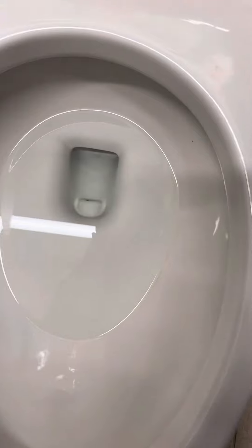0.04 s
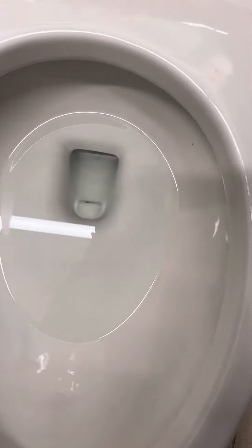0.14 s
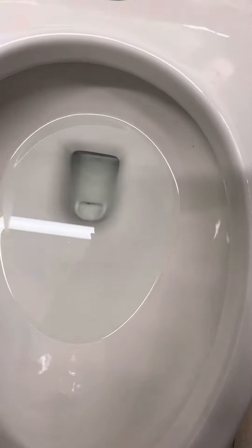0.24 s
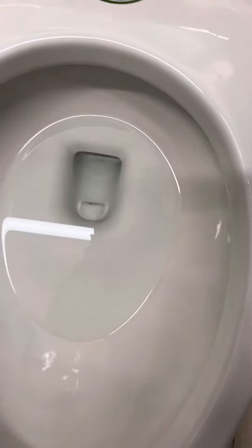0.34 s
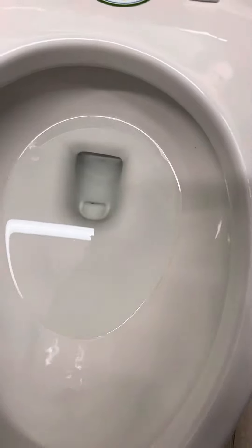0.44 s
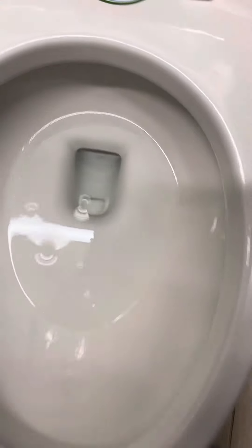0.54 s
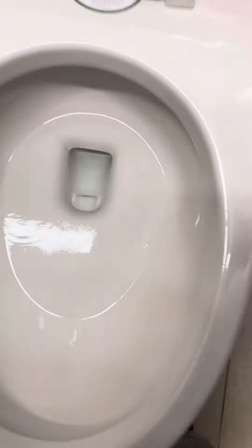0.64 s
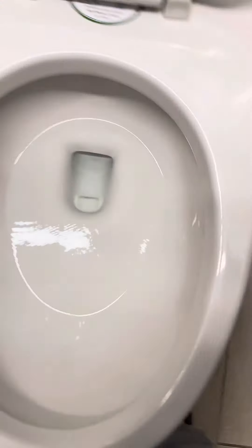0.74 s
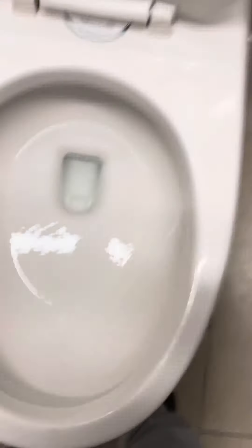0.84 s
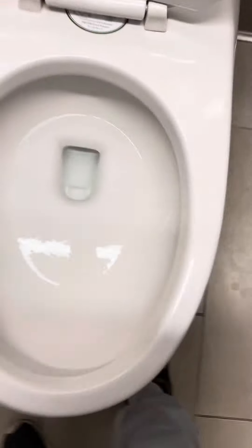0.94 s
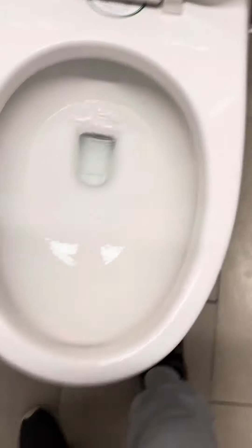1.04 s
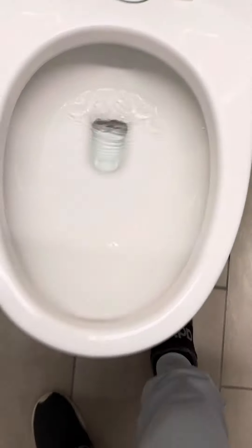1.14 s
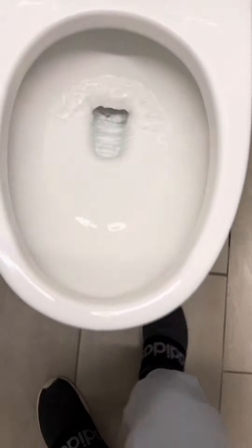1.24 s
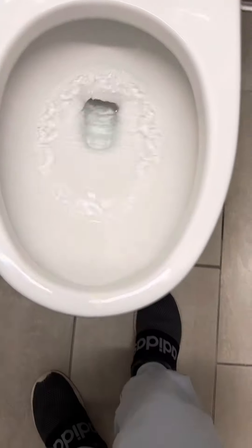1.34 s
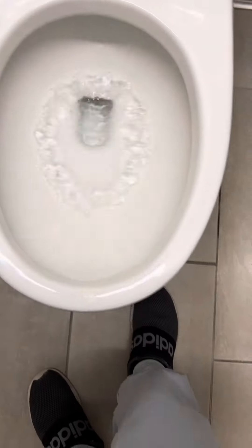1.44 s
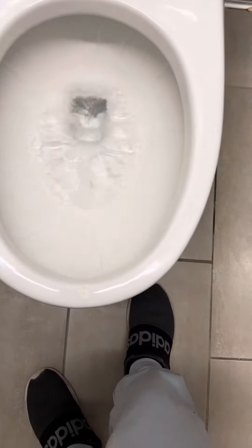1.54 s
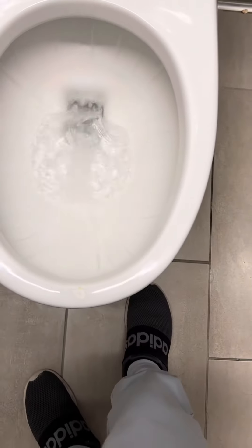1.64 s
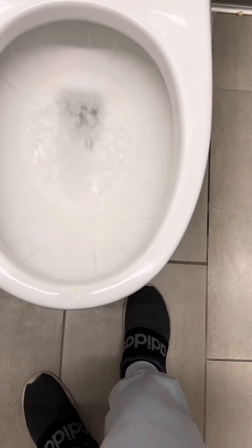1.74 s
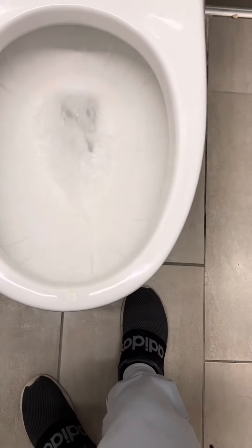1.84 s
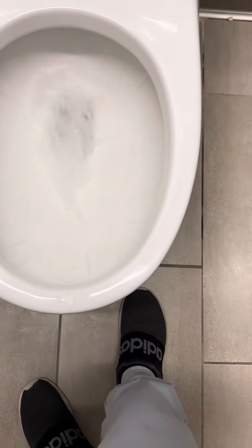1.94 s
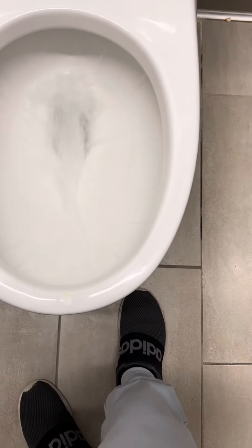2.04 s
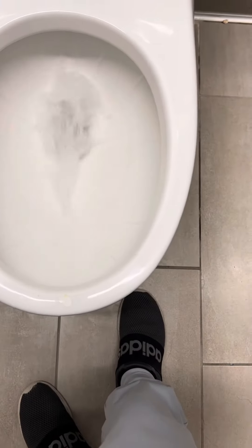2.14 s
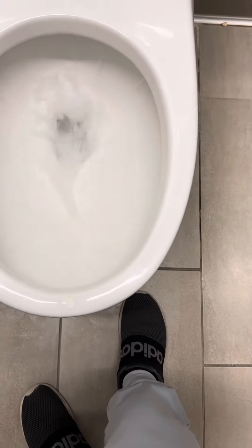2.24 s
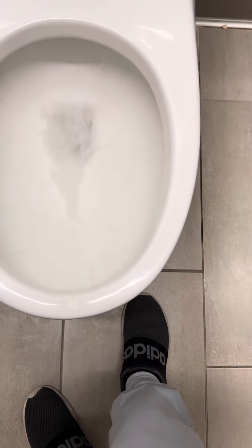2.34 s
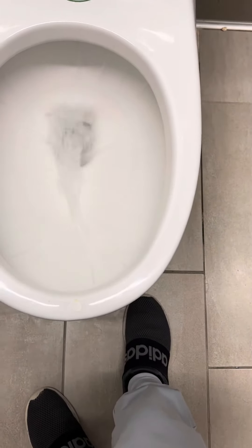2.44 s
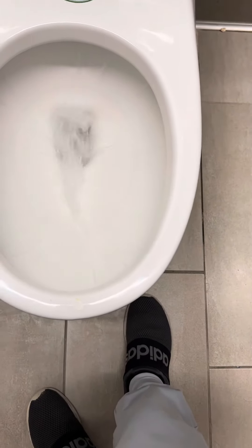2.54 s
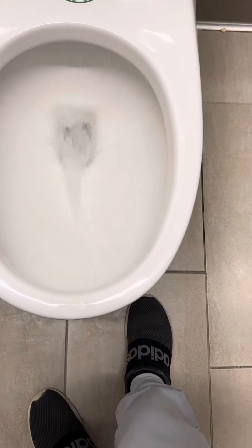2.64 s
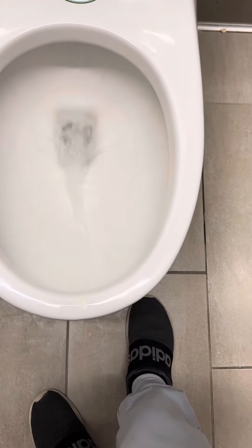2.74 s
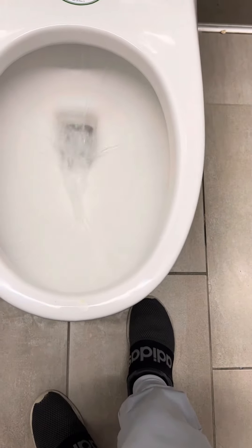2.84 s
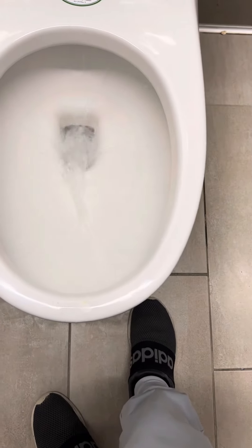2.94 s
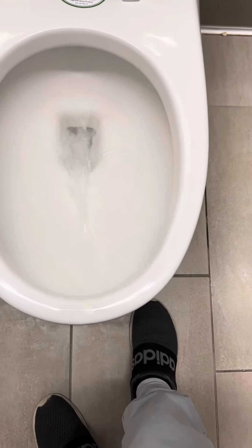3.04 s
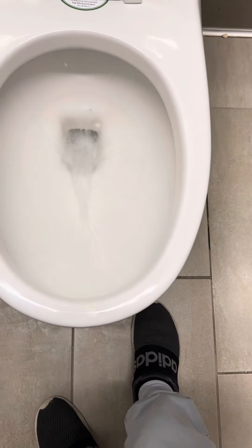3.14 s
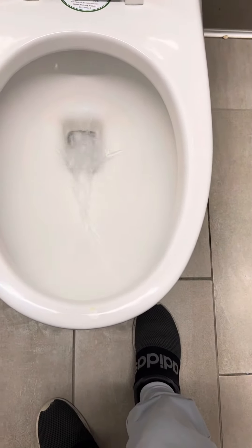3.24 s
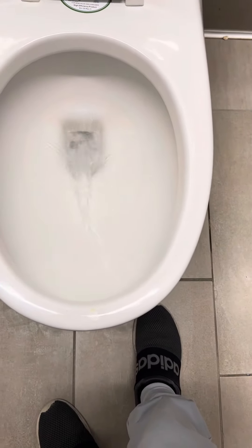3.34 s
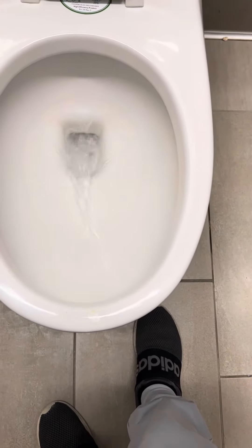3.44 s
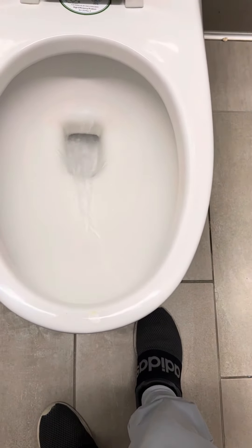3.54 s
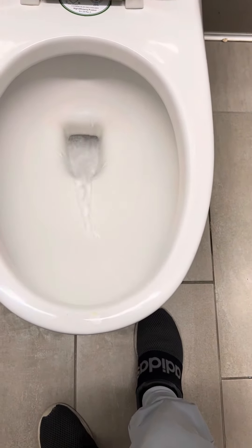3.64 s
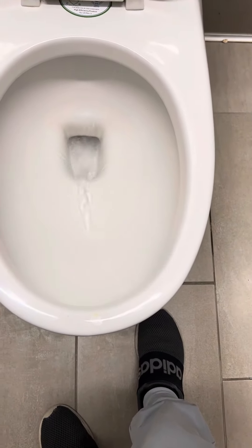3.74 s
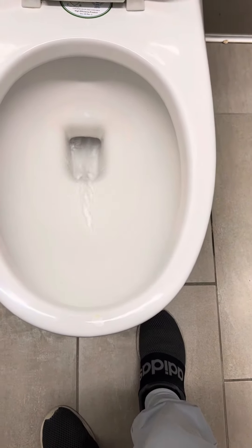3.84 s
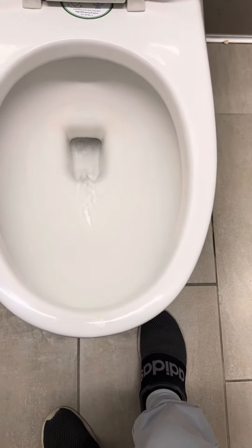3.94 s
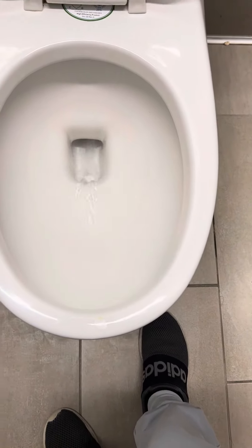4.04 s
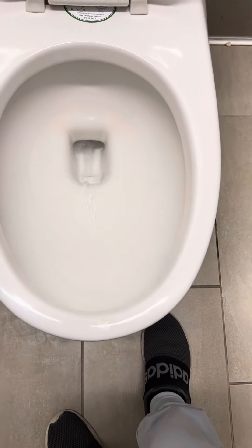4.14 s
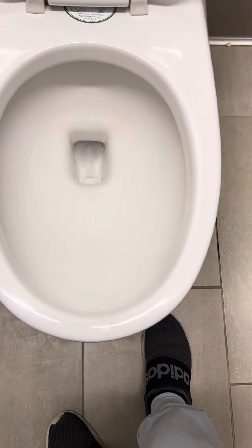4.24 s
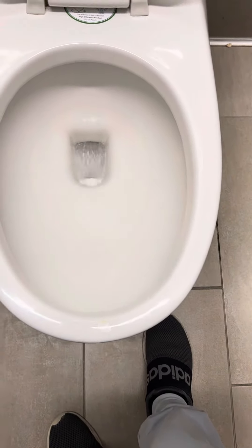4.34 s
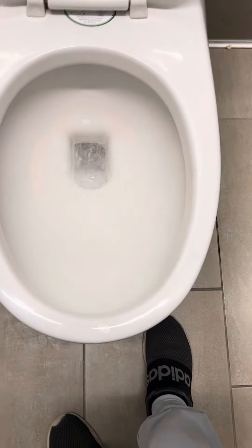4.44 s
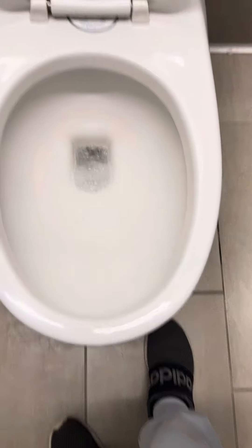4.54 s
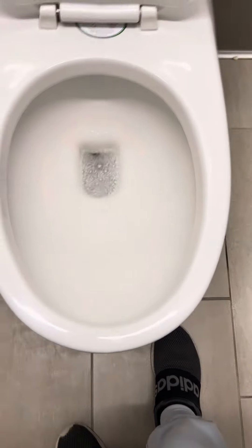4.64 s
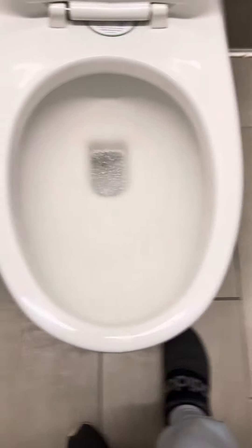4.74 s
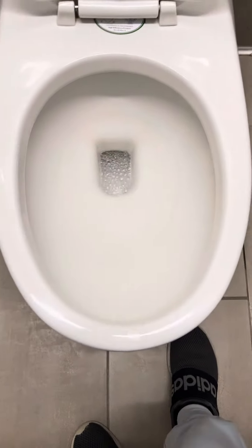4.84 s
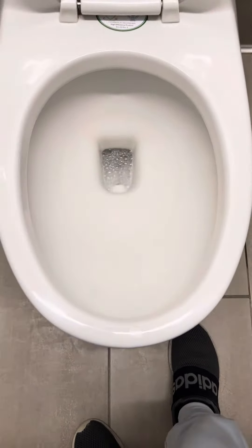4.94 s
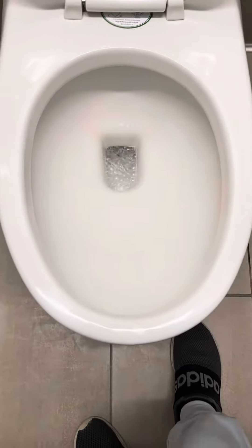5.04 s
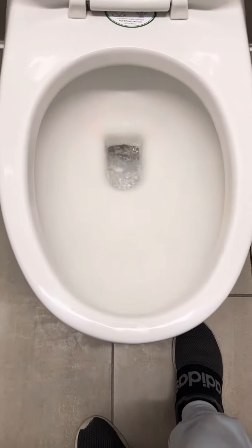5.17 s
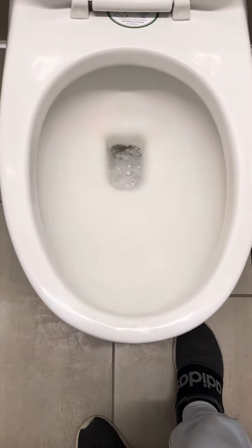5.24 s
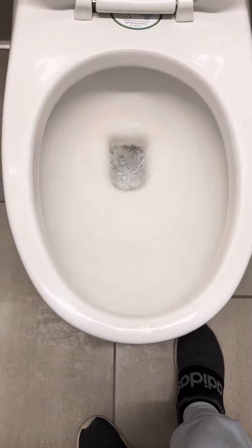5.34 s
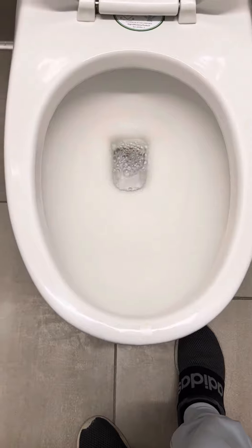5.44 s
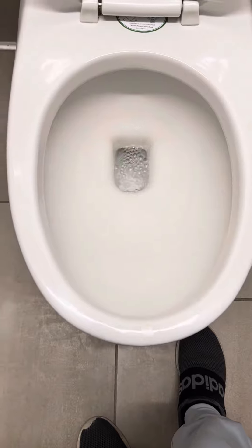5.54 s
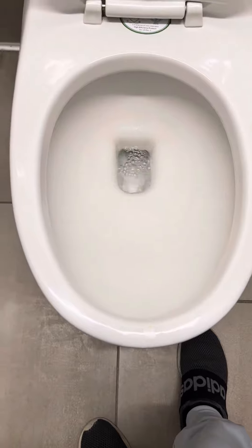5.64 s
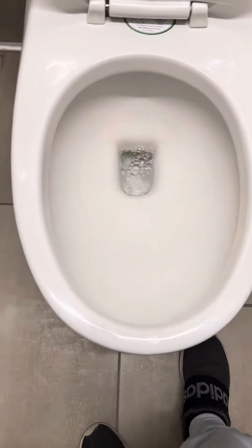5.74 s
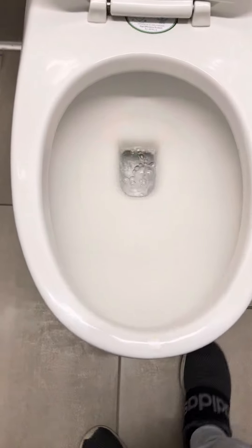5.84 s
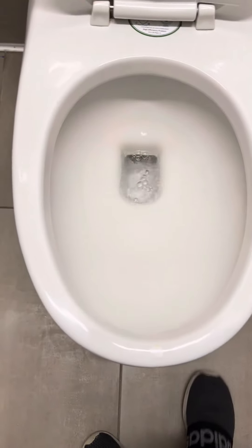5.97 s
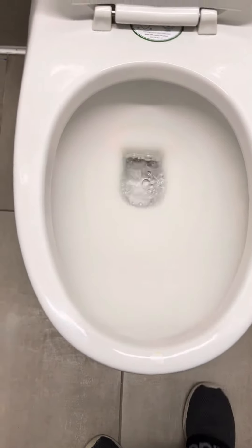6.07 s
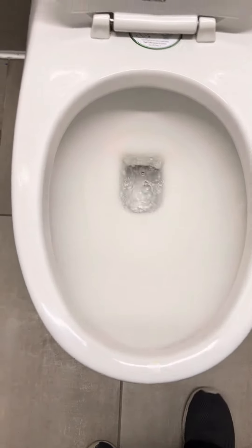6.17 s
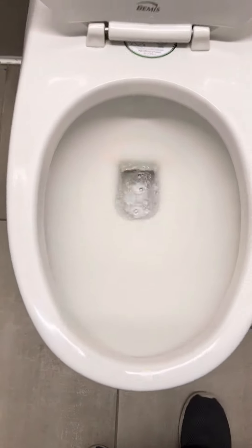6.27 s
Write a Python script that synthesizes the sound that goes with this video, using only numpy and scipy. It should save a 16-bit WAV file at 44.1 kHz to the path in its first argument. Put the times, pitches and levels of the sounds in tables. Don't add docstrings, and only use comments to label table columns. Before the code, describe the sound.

Near-silent room rumble, then a knock and deep booming pipe shudder as a toilet is flushed. Quick wet slaps become a dense broadband rush round the bowl, broken by heavy hollow glugs and popping air pockets, with unsteady high whistles over the hiss. The rush softens, a hollow hum sounds briefly, and it dies to clicks, a short cluster of plinking drips and sparse ticks. Handheld close stereo pickup, short tiled reverberation.

```python
import sys
import numpy as np
from scipy import signal
from scipy.fft import rfft, irfft
from scipy.io import wavfile
from scipy.ndimage import uniform_filter1d, minimum_filter1d

SR = 44100
rng = np.random.default_rng(int(sys.argv[2]) if len(sys.argv) > 2 else 0)


def master(y):
    cut = np.clip(np.atleast_2d(y).T, -1, 1)
    pcm = np.round(cut * 32767)
    wavfile.write(sys.argv[1], SR, pcm.astype(np.int16))


def to_linear_factor(level_db):
    exponent = np.asarray(level_db, float) / 20
    return 10 ** exponent


N = 278196

# time in seconds, jet flow in dB, air drawn into the trap in dB against the flow.
FLUSH_FLOW = [(0.0, -73, -0.5), (0.268, -61.5, -5.5), (0.284, -51, 5), (0.534, -44, 3.5), (0.955, -49, -5),
              (1.215, -33, -8), (1.275, -24, -20), (1.6, -30, -6.5), (1.84, -29, 9.5), (1.898, -32.5, 16),
              (1.972, -29, 7.5), (2.19, -29, 7.5), (2.26, -29.5, 4), (2.98, -32, -2), (3.03, -33.5, -0.5),
              (3.79, -42.5, -6), (4.28, -58, 1), (4.5, -72, 3.5)]
# time in seconds, jet flow in dB, air in dB against the flow.
REFILL_FLOW = [
    (4.539, -73, -2),
    (4.651, -62, -6.5),
    (4.901, -74, -12),
    (4.93, -64, -2.5),
    (4.999, -58.5, 5),
    (5.06, -69, 1.5),
    (5.25, -71, 2),
    (5.45, -76, -7),
    (6.31, -91.5, 8),
]
# frequency in Hz, density in dB per Hz.
FAINT_SPECTRUM = [(5000, -32.5), (5700, 7.5), (8000, 6.5), (9500, -4.5), (11000, -21.5), (16000, -38.5)]


def evened(x):
    return x / np.sqrt(np.mean(x ** 2) + 1e-20)


def read(points, hz):
    f, value = np.transpose(points)
    return np.interp(np.log(hz + 1), np.log(f + 1), value)


def curves(rows):
    s, *columns = np.transpose(rows)
    return [np.interp(np.arange(N) / SR, s, c) for c in columns]


def swells(rows):
    t, power = np.arange(N) / SR, 0
    for s, rise, hold, db, fall_db in rows:
        attack = np.clip((t - s) / rise, 0, 1) ** 2
        decay = to_linear_factor(db - fall_db * np.maximum(t - s - rise - hold, 0))
        power = power + (attack * decay) ** 2
    return np.sqrt(power)


def colour(x, points):
    return irfft(rfft(x) * to_linear_factor(read(points, np.fft.rfftfreq(N, 1 / SR))), N)


def wander(per_s):
    slow = signal.butter(2, per_s, fs=SR, output="sos")
    return evened(signal.sosfilt(slow, rng.standard_normal(N)))


def resonate(x, hz, width):
    turn = np.exp(2j * np.pi * np.cumsum(hz * np.ones(N)) / SR)
    r = np.exp(-np.pi * width / SR)
    return 2 * (turn * signal.lfilter([(1 - r) ** 2], [1, -2 * r, r * r], x / turn)).real


def resonant_noise(hz, width):
    return evened(resonate(rng.standard_normal(N), hz, width))


def lead(hz):
    # frequency in Hz, lead in half turns.
    low_leads = [(0, 0), (110, -.015), (200, -.1), (800, -.31), (1500, 0), (1750, .02), (2650, .7),
                 (3750, .27), (4300, .62), (4850, .5)]
    # lower edge in Hz, upper edge in Hz, lead held between them in half turns.
    rests = [(5400, 5850, 1), (7150, 8200, 2), (9550, 10900, 3), (11850, 13100, 4), (14700, 15500, 5),
             (16000, 16200, 5.04)]
    f, turns = np.transpose(low_leads + [(edge, k) for low, high, k in rests for edge in (low, high)])
    return np.pi * np.interp(hz, f, turns)


def likeness(hz):
    # frequency in Hz, unshared part between rests as a fraction.
    unshared = [(60, 0.033), (700, 0.081), (1100, .3), (2200, 0.47), (3700, 0.77), (5000, 1), (9000, 1),
                (14000, 0.96)]
    return np.clip(1 - read(unshared, hz) * abs(np.sin(lead(hz))) ** 1.2 - .0003, 0, 1)


def wash(points, patchy_db, size=256):
    frames, hz = 4 * N // size + 5, np.fft.rfftfreq(size, 1 / SR)
    a, b, c, d, patches = rng.standard_normal((frames, len(hz), 5)).T
    patches = evened(uniform_filter1d(uniform_filter1d(patches, 3, 0), 24, 1))
    same, left = likeness(hz)[:, None], a + 1j * b
    right = same * left + np.sqrt(1 - same ** 2) * (c + 1j * d)
    z = np.array([left, right]) * to_linear_factor(patchy_db * patches)
    noise = signal.istft(z, nperseg=size, noverlap=size * 3 // 4)[1][:, :N]
    return evened(colour(noise, points))


def bubbles(points, low_hz, high_hz, per_s, cycles, spread_db):
    out = np.zeros(N)
    for hz in np.geomspace(low_hz, high_hz, 14):
        u = np.arange(int(3 * cycles * SR / hz)) * hz / SR
        ring = np.sin(2 * np.pi * u * (1 + 0.029 * u)) * np.exp(-2 * u / cycles) * (1 - np.exp(-2 * u))
        born = rng.random(N) < per_s / 14 / SR
        size = to_linear_factor(spread_db * np.minimum(rng.exponential(1, N), 2.8)) * born
        out += signal.oaconvolve(size, ring)[:N]
    return evened(colour(out, points))


def pings(rows, rise, snap=1.0):
    out, t = np.zeros(N), np.arange(SR // 8) / SR
    for s, db, hz, t60 in rows:
        part = out[round(s * SR):][:len(t)]
        turn = 2 * np.pi * hz * t * (1 + rise * t)
        upper = 0.63 * np.sin(1.83 * turn) * np.exp(-t * hz / 0.9)
        ring = (np.sin(turn) + upper) * (1 - np.exp(-t * hz * snap))
        decay = to_linear_factor(db + 1.5 - 60 * (t / max(t60, .005)) ** 1.062)
        part += (decay * ring)[:len(part)]
    return out


def glides(rows):
    out, flutter, gusts = np.zeros(N), wander(200), wander(150)
    for s, length, start_hz, end_hz, db in rows:
        at = slice(round(s * SR), round((s + length) * SR))
        hz = np.linspace(start_hz, end_hz, at.stop - at.start) * (1 + 0.007 * flutter[at])
        tone = np.sin(2 * np.pi * np.cumsum(hz) / SR) * signal.windows.tukey(len(hz), .6)
        out[at] += to_linear_factor(db + 4 * np.minimum(gusts[at], 1)) * tone
    return out


def room_floor():
    # frequency in Hz, density in dB per Hz.
    floor_spectrum = [(30, -6.5), (48, 3.5), (100, -3.5), (250, -7.5), (500, -13.5), (1000, -31),
                      (2700, -33), (5000, -29), (8500, -38.5), (10500, -60)]
    return to_linear_factor(-57.5) * wash(floor_spectrum, patchy_db=-4.0)


def room(x):
    # frequency in Hz, reverberation time T60 in seconds.
    decay_times = [(200, 0.084), (1000, 0.33), (5000, 0.23), (14000, 0.037)]
    taps = np.zeros((2, SR // 2))
    at = np.arange(160, SR // 2 - 20, 20) + rng.integers(0, 20, (2, (SR // 2 - 161) // 20))
    np.put_along_axis(taps, at, rng.choice([-1., 1.], at.shape), 1)
    hz, t, z = signal.stft(taps, SR, nperseg=256)
    same = likeness(hz)[:, None]
    z = np.array([z[0], same * z[0] + np.sqrt(1 - same ** 2) * z[1]])
    tail = signal.istft(z * to_linear_factor(-60 * t / read(decay_times, hz)[:, None]), SR, nperseg=256)[1]
    return signal.fftconvolve(x[None], tail / np.linalg.norm(tail[0]), axes=1)[:, :N]


def drained():
    return np.clip(np.arange(N) / SR - 2, -1, 2.4)


def boom(pressure_db):
    # frequency in Hz, density in dB per Hz.
    boom_spectrum = [(25, -56.5), (45, -21.5), (66, 4), (78, -8.5), (89, 4.5), (105, -9), (140, -14),
                     (200, -57.5)]
    return to_linear_factor(pressure_db) * wash(boom_spectrum, patchy_db=1.6, size=1024)


def shudder(pressure_db, surge):
    # frequency in Hz, density in dB per Hz.
    shudder_spectrum = [(110, -21.5), (140, -6.5), (170, 0.5), (200, 2), (245, 7.5), (275, -0.5),
                        (330, -42.5)]
    # start in seconds, rise in seconds, hold in seconds, level in dB, fall in dB per second.
    valve_shudder = [
        (0.3, 0.12, .01, -52, 45.9),
    ]
    level = np.hypot(to_linear_factor(pressure_db - 5), swells(valve_shudder))
    return level * to_linear_factor(2.6 * surge) * wash(shudder_spectrum, patchy_db=2.0, size=1024)


def hum(surge):
    # frequency in Hz, density in dB per Hz.
    body_spectrum = [(230, -30), (280, -1), (306, 9), (330, -9), (356, 8), (385, -5), (415, 5), (440, -7.5),
                     (520, -8.5), (640, -46)]
    # start in seconds, rise in seconds, hold in seconds, level in dB, fall in dB per second.
    valve_hum = [
        (0.24, 0.077, 0.25, -35.5, 23),
        (1.0, 0.22, 0.086, -37.5, 32),
        (3.0, 0.07, 0.1, -46.5, 37),
        (3.87, 0.047, 0.25, -47.5, 153.5),
    ]
    flow_db, air_db = curves(FLUSH_FLOW + REFILL_FLOW)
    driven = to_linear_factor(flow_db + air_db - 4.5 - drained())
    idle = to_linear_factor(-66.5)
    level = np.hypot(driven, swells(valve_hum) + idle)
    return level * to_linear_factor(1.2 * surge) * wash(body_spectrum, patchy_db=1.5, size=1024)


def pipes():
    # time in seconds, pressure unrest in dB.
    pressure = [(0.0, -50), (0.23, -50.5), (0.324, -42), (0.522, -27), (0.874, -41), (1.0, -41.5),
                (1.4, -44), (1.89, -39), (2.5, -36), (3.35, -47.5), (3.7, -54.5), (3.87, -62), (3.95, -48),
                (4.27, -50.5), (4.5, -70), (4.75, -64.5), (5.25, -59.5), (6.31, -60)]
    pressure_db, surge = curves(pressure)[0], wander(14)
    return boom(pressure_db) + shudder(pressure_db, surge) + hum(surge)


def leaking_valve():
    # start in seconds, rise in seconds, hold in seconds, level in dB, fall in dB per second.
    leaks = [
        (0.13, 0.088, 0.19, -59.5, 400),
        (4.57, 0.037, 0.077, -62.5, 159),
    ]
    return to_linear_factor(8.5) * swells(leaks) * resonant_noise(4900, 750)


def singing_trap():
    # start in seconds, rise in seconds, hold in seconds, level in dB, fall in dB per second.
    column = [
        (2.2, .05, 0.089, -49, 60),
        (3.06, 0.07, 0.094, -36, 120),
        (4.0, 0.026, 0.13, -49.5, 199),
    ]
    # start in seconds, rise in seconds, hold in seconds, level in dB, fall in dB per second.
    moan = [
        (4.6, 0.035, 0.11, -56.5, 120.6),
        (4.99, 0.021, 0.129, -62, 80.3),
    ]
    return swells(column) * resonant_noise(301, 44) + swells(moan) * resonant_noise(446, 88)


def knocks():
    # start in seconds, peak in dB, frequency in Hz, ring T60 in seconds.
    pipe_knocks = [
        (0.289, -15, 362, 0.07),
        (0.303, -31, 350, .12),
        (0.457, -25, 232, 0.091),
        (0.542, -9, 266, 0.028),
        (1.575, -18, 324.1, 0.4),
        (1.589, -14.5, 323.3, 0.24),
    ]
    # start in seconds, peak in dB, frequency in Hz, ring T60 in seconds.
    wall_thumps = [(0.323, -19.5, 77.6, 0.23), (0.491, -6.5, 87, 0.065), (0.615, -15, 69.6, 0.25),
                   (0.679, -15, 85.9, 0.13), (0.721, -18.5, 56.5, 0.15), (0.741, -19, 87, 0.18),
                   (0.807, -22.5, 86, 0.2), (0.867, -19, 80, 0.13), (3.95, -37, 91.5, 0.097),
                   (1.04, -28, 79, 0.22), (1.252, -30, 76.6, .2), (3.17, -40, 62, 0.198),
                   (5.85, -43, 49.4, .3)]
    return pings(pipe_knocks + wall_thumps, rise=0.092)


def drips():
    # start in seconds, peak in dB,
    # frequency in Hz, ring T60 in seconds.
    drops_and_slaps = [(0.116, -45, 1840, .019), (0.338, -31, 974, .05), (4.094, -42, 2100, .015),
                       (4.121, -29, 666, .022), (4.161, -36, 700, .02), (3.99, -36, 720, .015),
                       (4.42, -48, 1400, .04), (4.204, -43, 1550, .06), (4.29, -44, 1400, .04),
                       (4.32, -44, 1200, .04), (4.584, -53, 1774, .036), (4.9235, -31, 1450, .035),
                       (4.944, -35, 1110, .04), (4.976, -43, 950, .025), (4.99, -36.5, 1400, .025),
                       (5.018, -42, 1380, .04), (5.041, -44, 1390, .06), (5.062, -50, 1100, .03),
                       (5.076, -34.5, 690, .075), (5.741, -54, 1260, .02), (4.955, -54, 3700, .04),
                       (4.985, -52, 2700, .04), (5.0, -53, 3700, .04), (5.012, -51, 2700, .03),
                       (5.04, -52, 2300, .03), (5.128, -53, 1800, .03), (5.145, -53, 1250, .03),
                       (5.425, -60, 1060, .02), (5.545, -62, 1160, .02), (5.67, -58, 1300, .012),
                       (5.742, -58, 800, .02),
                       (.285, -50, 1800, .022), (.337, -36, 1860, .019), (1.01, -29, 1330, .02),
             (1.011, -28, 790, .04), (1.052, -30, 1450, .03), (1.053, -28, 790, .025),
             (1.088, -29, 1340, .07), (1.106, -29, 1400, .02), (1.129, -24, 1500, .015),
             (1.149, -24, 1600, .025), (1.177, -29, 1150, .025), (1.205, -25, 1800, .02),
             (1.232, -28, 800, .04), (1.238, -22, 1600, .03), (1.293, -18, 1650, .025),
             (1.332, -16, 1850, .03), (1.372, -21, 1350, .03), (1.405, -21, 1450, .04),
             (1.465, -20, 1500, .03), (4.926, -47, 2300, .02), (4.94, -46, 2000, .02),
             (4.958, -45, 1250, .02), (4.965, -48, 800, .02), (4.998, -48, 560, .04),
             (5.0, -44, 1100, .025), (5.03, -47, 520, .05), (5.078, -39, 1490, .035)]
    # start in seconds, length in seconds, first pitch in Hz, last pitch in Hz, level in dB.
    bloops = [
        (0.7, .09, 1020, 1040, -50),
        (4.913, .012, 2500, 2300, -64),
        (5.857, .016, 1230, 1270, -66),
        (5.876, .026, 1450, 1950, -71),
        (5.934, .018, 1230, 1120, -59),
        (5.946, .038, 1110, 1260, -64),
    ]
    return pings(drops_and_slaps, rise=0.67, snap=3.6) + glides(bloops)


def ticks():
    # start in seconds, peak in dB, centre frequency in Hz.
    bursts = [(0.2805, -36, 3374), (0.3351, -28, 2300), (0.402, -37.5, 4910), (0.498, -30, 2665),
              (0.8206, -35, 4087), (0.9697, -31.5, 12910), (1.0093, -25, 7130), (1.0298, -27, 3247),
              (1.052, -24, 12050), (1.0877, -24, 12190), (1.1293, -18.5, 12500), (1.1456, -21, 12500),
              (1.1714, -25, 12950), (1.2047, -22, 7500), (1.2327, -17, 7800), (1.2607, -14, 7020),
              (1.4253, -16, 3220), (1.4667, -15, 4900), (1.4952, -15, 3620), (4.0273, -38, 6900),
              (4.0386, -33.5, 3894), (4.0908, -38, 7080), (4.1789, -31, 13150), (4.2994, -43, 3776),
              (4.6039, -49, 4930), (4.6384, -50, 4000), (4.653, -46, 5000), (4.9218, -50.5, 7730),
              (4.9551, -51, 3680), (5.1531, -57, 13400), (5.3008, -50.5, 4660), (5.5144, -57, 4500),
              (5.531, -50, 8130), (5.67, -55, 5000), (5.7399, -52, 3500), (5.8771, -63, 6700),
              (5.923, -55, 4800), (5.9738, -64, 6500), (6.0835, -57, 8200), (6.1684, -59, 6640)]
    out, t = np.zeros(N), np.arange(SR // 10) / SR
    hz = np.fft.rfftfreq(len(t), 1 / SR) + 1
    decay = 1.6 * to_linear_factor(-60 * t / 0.011) + 0.73 * to_linear_factor(-60 * t / 0.069)
    for s, db, centre in bursts:
        octaves = np.log2(hz / centre)
        band = to_linear_factor(np.minimum(2.3 * octaves, -6.0 * octaves))
        puff = evened(irfft(rfft(rng.standard_normal(len(t))) * band, len(t)))
        part = out[round(s * SR):][:len(t)]
        part += (to_linear_factor(db - 6.5) * decay * puff)[:len(part)]
    return out


def water_sheet():
    # start in seconds, rise in seconds, hold in seconds, level in dB, fall in dB per second.
    sheets = [
        (.955, .005, .015, -46, 600),
        (1.05, .004, .012, -40, 700),
        (1.078, .008, .03, -39, 600),
        (1.118, .008, .012, -36, 800),
        (1.146, .005, .012, -36, 700),
        (1.174, .008, .03, -34, 700),
        (1.23, .04, .09, -30, 120),
    ]
    return swells(sheets) * resonant_noise(1750, 1200)


def whistles():
    # start in seconds, length in seconds, first pitch in Hz, last pitch in Hz.
    squeals = [(1.956, .035, 4750, 4750), (1.972, .028, 4300, 4050), (1.984, .036, 5200, 5180),
               (1.994, .02, 3610, 3450), (2.035, .03, 4800, 4900), (2.056, .035, 4640, 4530),
               (2.093, .022, 4800, 4650), (2.126, .04, 5200, 5180), (2.148, .03, 4720, 5000),
               (2.19, .03, 4120, 4080), (2.177, .05, 5220, 5200), (2.21, .04, 3980, 3960),
               (2.217, .03, 4340, 4800), (2.292, .025, 4770, 4850), (2.4, .025, 4200, 4200),
               (2.4, .045, 3700, 3900), (2.417, .07, 4850, 4880), (2.515, .04, 4900, 4820),
               (2.527, .045, 4300, 4100), (2.55, .03, 4000, 3880), (2.57, .035, 4790, 4900),
               (2.612, .05, 3980, 3800), (2.685, .04, 4980, 4800), (2.692, .035, 4130, 4200),
               (2.711, .048, 4410, 3450), (2.737, .055, 3320, 3330), (2.75, .025, 5000, 5050),
               (2.822, .05, 3720, 3900), (2.855, .055, 3900, 4600), (2.864, .045, 4780, 4860),
               (2.885, .105, 3335, 3350), (2.944, .04, 3920, 3900), (2.951, .022, 3470, 3640)]
    # start in seconds, rise in seconds, hold in seconds, level in dB, fall in dB per second.
    sucking = [
        (1.93, 0.054, 1, -39.5, 198.6),
    ]
    jet_hz = [4000, 4850]
    jet_wander = [.06, .02]
    rows = []
    for s, length, start_hz, end_hz in squeals:
        db = -24.5 + 6 * np.log2(start_hz / 4500) - 2 * (s - 2)
        rows.append((s, length, start_hz, end_hz, db))
    out = glides(rows)
    for hz, spread in zip(jet_hz, jet_wander):
        jet = resonant_noise(hz * (1 + spread * wander(8.8)), 60)
        out += swells(sucking) * to_linear_factor(4 * np.minimum(wander(27), 1.3)) * jet
    return out


def gulps():
    # start in seconds, peak in dB, frequency in Hz, ring T60
    # in seconds.
    air_pockets = [(1.573, -0.5, 734.6, 0.015), (1.715, -14, 720, 0.03), (1.792, -8, 641.4, 0.011),
                   (1.839, -2, 1143, 0.054), (1.883, -2, 833, 0.027), (1.899, -18, 301, 0.055),
                   (1.927, -8, 742, 0.014), (1.939, 0, 679, 0.026), (1.964, -4, 730, 0.017),
                   (2.004, -18.5, 1057, 0.13), (2.022, -8.5, 755, 0.018), (2.039, 1, 822, 0.021),
                   (2.069, -11.5, 842, 0.054), (2.112, 0.5, 623, 0.025), (2.211, -21.5, 754, 0.048),
                   (2.291, -7.5, 668, 0.018), (2.329, -12.5, 1198, 0.029), (2.352, -14, 694, 0.032),
                   (2.513, -12, 750, 0.029), (2.548, -7.5, 818, 0.016), (2.703, -8.5, 1170, 0.017),
                   (2.727, -9, 880, 0.026), (2.731, -11, 1272, 0.01),
                   (1.842, -14, 2050, .04), (1.857, -9, 1550, .025), (1.845, -10, 1500, .025),
            (1.912, -13, 1400, .02), (1.955, -13, 1500, .02), (2.038, -12, 1350, .02),
            (2.006, -12, 1600, .015), (2.06, -11, 1600, .02), (2.086, -12, 800, .02),
            (2.525, -11, 760, .012), (2.567, -12, 1100, .012), (2.782, -13, 1310, .012),
            (2.849, -14, 912, .01), (2.362, -13, 1400, .02), (2.465, -14, 700, .02), (2.49, -14, 720, .02),
            (2.665, -15, 1450, .02), (2.62, -15, 800, .02), (2.523, -13, 1150, .025),
            (2.702, -11, 750, .012), (2.707, -10, 1480, .02), (2.292, -13, 1200, .012)]
    # start in seconds, peak in dB, frequency in Hz, ring T60 in seconds.
    glugs = [(1.806, 4, 680, 0.05), (1.866, 7, 640, 0.036), (2.151, 4, 740, 0.03), (2.183, 5, 670, 0.028),
             (1.726, -12, 600, .03), (1.619, -15, 1310, .05), (1.633, -17, 1600, .03),
             (1.643, -8, 1540, .025), (1.655, -16, 1500, .03), (1.668, -15, 1330, .05),
             (1.676, -12, 900, .035), (1.752, -11, 700, .03), (1.786, -12, 1170, .045),
             (1.783, -16, 1480, .03)]
    return pings(air_pockets, rise=0.42, snap=2.2) + pings(glugs, rise=.5, snap=.22)


def gurgle(flow_db, air_db, churn):
    # frequency in Hz, density in dB per Hz.
    gurgle_spectrum = [(260, -43.5), (450, -5), (528, -10.5), (641, -1.5), (813, -1.5), (947, -5.5),
                       (1050, -10.5), (1360, -41.5), (2310, -120)]
    rings = bubbles(gurgle_spectrum, 520, 980, per_s=300, cycles=5.3, spread_db=3)
    return to_linear_factor(flow_db + air_db + .7 * churn) * (wash(gurgle_spectrum, patchy_db=2) + 0.45 * rings)


def slosh(flow_db, air_db, churn):
    # frequency in Hz, density in dB per Hz.
    slosh_spectrum = [(800, -36.5), (1020, -3), (1150, 1.5), (1600, -1), (1800, -8.5), (2060, -3),
                      (2300, -10), (3200, -26.5)]
    # start in seconds, rise in seconds, hold in seconds, level in dB, fall in dB per second.
    splashes = [
        (2.5, 0.038, .11, -46, 200),
        (2.905, 0.01, 0.025, -36, 500),
        (3.2, .02, .15, -49.5, 77),
        (4.92, 0.005, 0.2, -60, 70),
    ]
    air_share = np.where(air_db < 0, 1, 0.088)
    slosh_db = flow_db + 1.5 + 2 * drained() + air_share * air_db
    rings = bubbles(slosh_spectrum, 1000, 2200, per_s=1200, cycles=9, spread_db=1.5)
    sound = 0.8 * wash(slosh_spectrum, patchy_db=1.8) + 0.55 * rings
    return np.hypot(to_linear_factor(slosh_db), swells(splashes)) * to_linear_factor(.6 * churn) * sound


def spray(flow_db, air_db, churn):
    # frequency in Hz, density in dB per Hz.
    spray_spectrum = [(1200, -34.5), (1700, -5.5), (2100, 1.5), (2600, 3), (3300, 1.5), (4400, 1.5),
                      (5300, 2.5), (6000, -11.5)]
    # start in seconds, rise in seconds, hold in seconds, level in dB, fall in dB per second.
    mist = [
        (4.15, .05, 0.129, -58.5, 70.7),
        (4.6, 0.0204, 0.0613, -63, 150.5),
    ]
    spray_db = flow_db - 0.31 * np.maximum(air_db, 0)
    rings = bubbles(spray_spectrum, 2800, 5300, per_s=500, cycles=58, spread_db=3.5)
    sound = 0.78 * wash(spray_spectrum, patchy_db=3.0) + 0.25 * rings
    return np.hypot(to_linear_factor(spray_db + 4.0), swells(mist)) * to_linear_factor(.9 * churn) * sound


def fizz(flow_db, churn):
    # frequency in Hz, density in dB per Hz.
    fizz_spectrum = [(5000, -33), (5700, 2.5), (7500, -2), (9000, -4.5), (11000, -4.5), (13000, -4.5),
                     (15000, 3.5), (15900, -4.5), (16000, -72.5)]
    fizz_db = flow_db + 0.39 * (flow_db + 30.5)
    rings = bubbles(fizz_spectrum, 5800, 23000, per_s=5500, cycles=6.9, spread_db=-6.5)
    full = 0.88 * wash(fizz_spectrum, patchy_db=4.0) + 0.37 * rings
    strong = np.clip((fizz_db + 75.0) / 14, 0, 1)
    sound = strong * full + np.sqrt(1 - strong ** 2) * wash(FAINT_SPECTRUM, patchy_db=9.0)
    return to_linear_factor(fizz_db + 5.0 + .7 * churn) * sound


def water():
    flow_db, air_db = curves(FLUSH_FLOW + REFILL_FLOW)
    churn = wander(22)
    low = gurgle(flow_db, air_db, churn) + slosh(flow_db, air_db, churn)
    return low + spray(flow_db, air_db, churn) + fizz(flow_db, churn)


def scene():
    events = leaking_valve() + singing_trap() + knocks() + drips() + ticks()
    events += water_sheet() + whistles() + gulps()
    echo = to_linear_factor(-14) * room(events)
    return room_floor() + pipes() + events + echo + water()


def top_cut(x):
    return signal.sosfilt(signal.butter(12, 16010, fs=SR, output="sos"), x)


def record(dry):
    # frequency in Hz, left-minus-right level between rests in dB.
    left_balance = [(150, 1.5), (550, 4.5), (850, .5), (1100, -4.5), (2700, -2.5), (3700, -0.5),
                    (4700, -3.5), (6200, -0.5)]
    hz = np.fft.rfftfreq(N, 1 / SR)
    half = np.exp(.5j * lead(hz)) * to_linear_factor(read(left_balance, hz) * abs(np.sin(lead(hz))) / 2)
    pair = irfft(rfft(dry) * np.array([half, 1 / half]), N)
    pair = pair + to_linear_factor(-90) * evened(colour(rng.standard_normal((2, N)), FAINT_SPECTRUM))
    peak = -minimum_filter1d(-abs(pair).max(0), 600)
    ceiling = .88
    reduction = uniform_filter1d(np.maximum(peak / ceiling, 1), 300)
    return top_cut(pair / reduction)


dry = scene()
out = record(dry)
master(out)
```